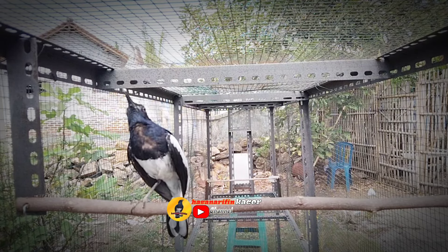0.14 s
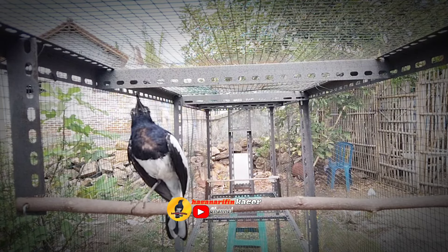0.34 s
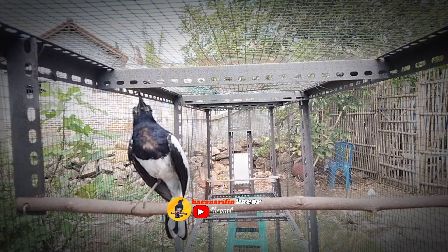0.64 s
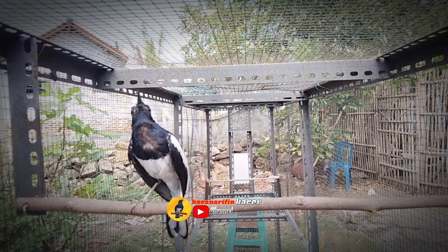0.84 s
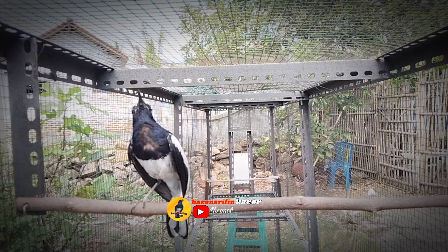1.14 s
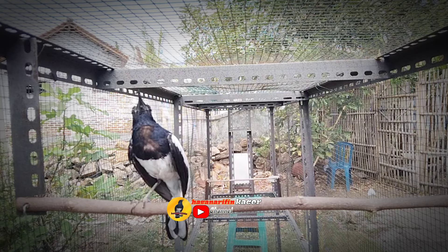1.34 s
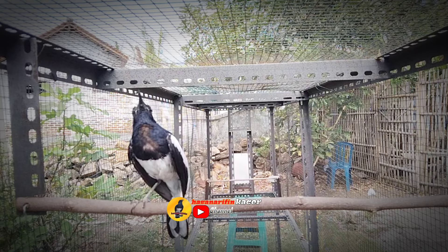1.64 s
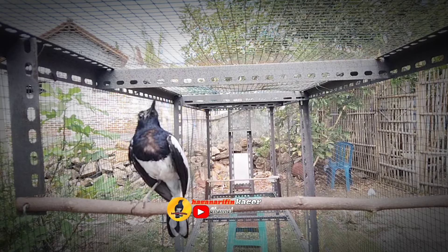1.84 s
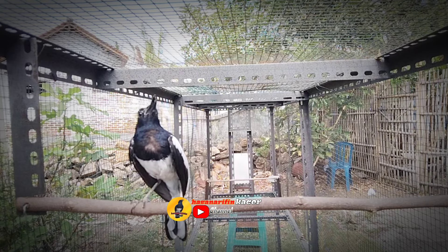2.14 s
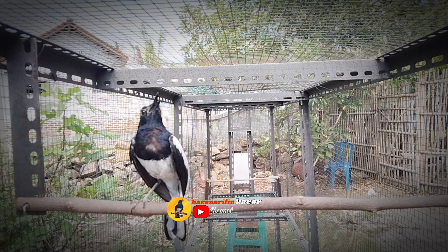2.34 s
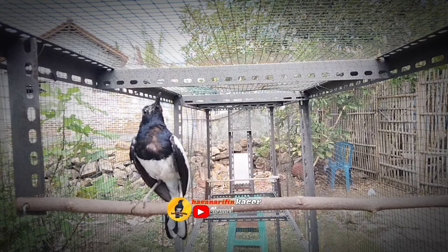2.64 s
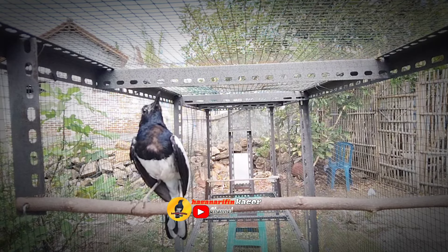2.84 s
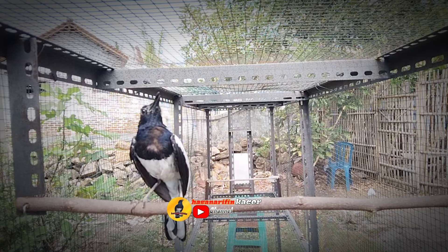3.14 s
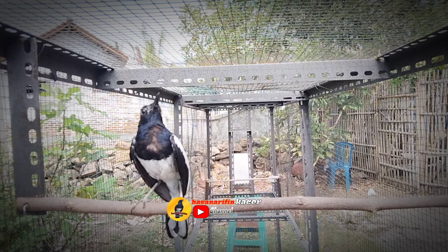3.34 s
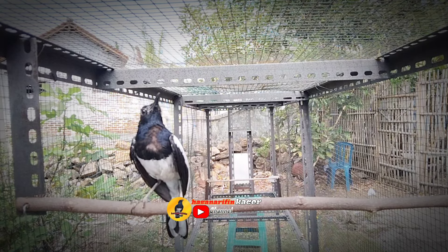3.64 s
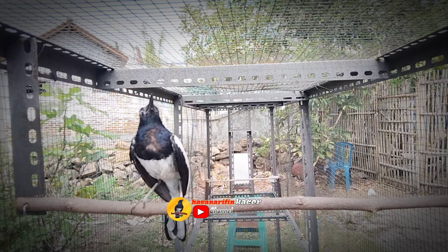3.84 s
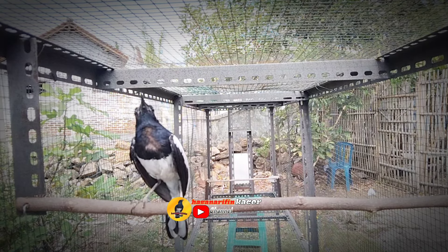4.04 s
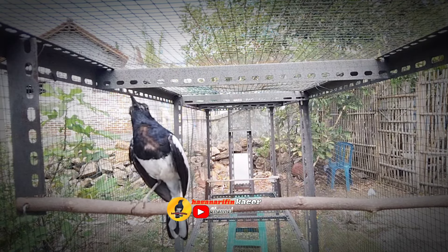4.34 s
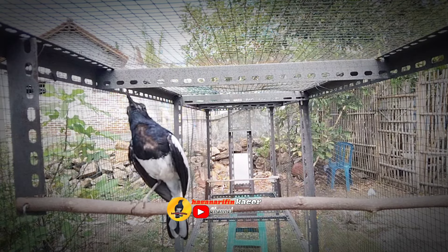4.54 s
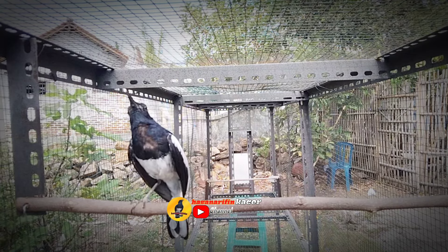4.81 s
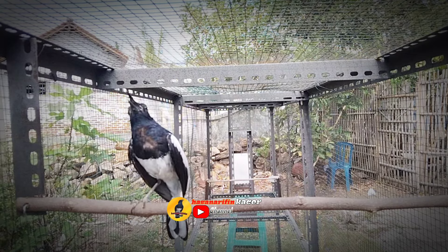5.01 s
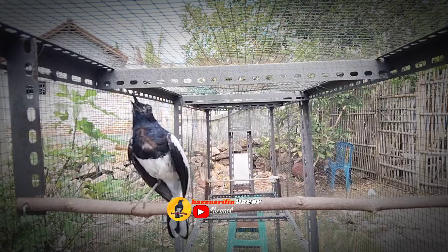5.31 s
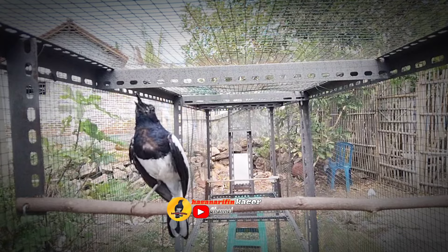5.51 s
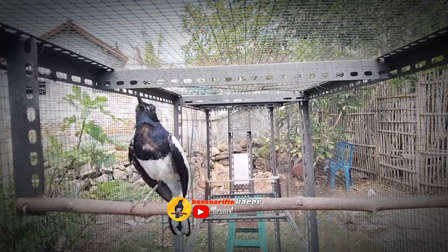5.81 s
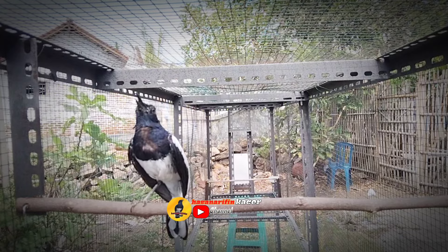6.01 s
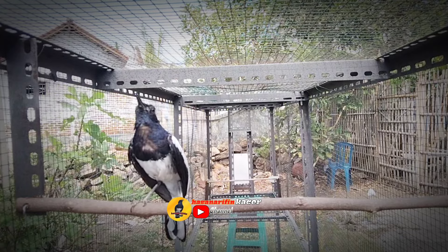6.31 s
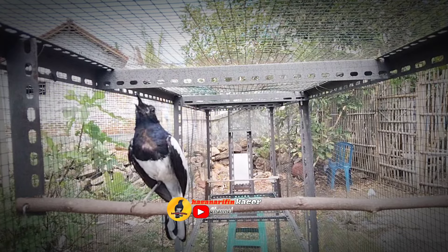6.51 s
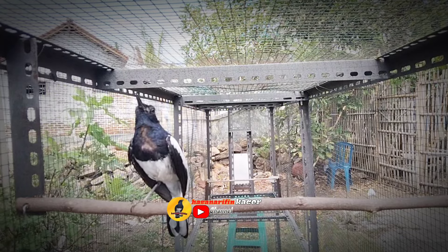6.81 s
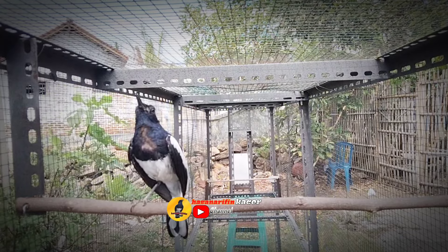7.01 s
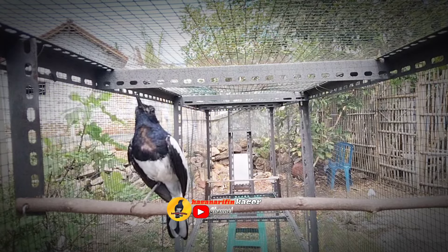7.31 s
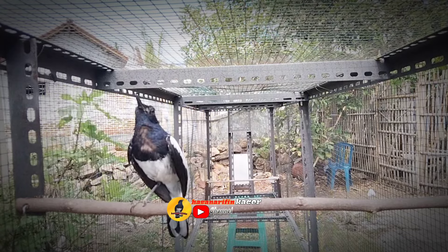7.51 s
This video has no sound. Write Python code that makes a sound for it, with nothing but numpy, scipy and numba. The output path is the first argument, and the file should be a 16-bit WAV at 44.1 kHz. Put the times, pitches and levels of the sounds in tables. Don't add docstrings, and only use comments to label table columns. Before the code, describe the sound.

Bright, quick whistled phrases from a nearby perched bird echo off yard walls over faint distant birds and clatter, until low wind buffets the microphone.

```python
import sys
import numpy as np
from scipy import signal
from scipy.fft import rfft, irfft
from scipy.io import wavfile
from scipy.ndimage import uniform_filter1d, minimum_filter1d
from numba import njit

SR = 44100
rng = np.random.default_rng(int(sys.argv[2]) if len(sys.argv) > 2 else 0)


def voltage_ratio(level):
    return 10 ** (np.asarray(level, float) / 20)


def store_wav(level_fs):
    pcm = np.round(np.clip(np.atleast_2d(level_fs), -1, 1) * 32767)
    wavfile.write(sys.argv[1], SR, pcm.T.astype(np.int16))


N = 337806


def unit(x):
    return x / np.sqrt(np.mean(x ** 2))


def band(x, lo_hz, hi_hz, order=2):
    return signal.sosfilt(signal.butter(order, [lo_hz, hi_hz], "bandpass", fs=SR, output="sos"), x)


def noise_band(lo_hz, hi_hz, order=2):
    return unit(band(rng.standard_normal(N), lo_hz, hi_hz, order))


def walk(rate_hz):
    k = int(SR / rate_hz)
    steps = np.repeat(rng.standard_normal(N // k + 1), k)
    return unit(uniform_filter1d(uniform_filter1d(steps, k), k)[:N])


def span(start_s, end_s):
    return np.interp(np.arange(N) / SR, [start_s - .003, start_s, end_s, end_s + .003], [0, 1, 1, 0])


def score(notes, edge_s):
    t = np.arange(N) / SR
    s, *columns = np.transpose(np.concatenate(notes))
    gate = np.zeros(N)
    for note in notes:
        start_s, end_s = note[0][0], note[-1][0]
        part = slice(max(int((start_s - edge_s) * SR), 0), int((end_s + edge_s) * SR))
        inside_s = np.minimum(t[part] - start_s, end_s - t[part])
        gate[part] += np.clip(inside_s / edge_s + 1, 0, 1)
    smooth = [uniform_filter1d(uniform_filter1d(np.interp(t, s, c), size=120), size=120) for c in columns]
    return smooth, np.minimum(gate, 1) ** 2


def whistle(hz, partials, rough, doubling=0):
    phase = 2 * np.pi * np.cumsum(hz) / SR
    tone = 0
    for k, strength in enumerate(partials, 1):
        below_top = np.clip((15700 - k * hz) / 500, 0, 1)
        tone = tone + strength * np.sin(k * phase) * below_top
    return np.sqrt(2) * tone * (1 + rough + 2 * doubling * np.sin(phase / 2))


WALLS_T60_S, WALLS_DB, WALLS_EARLY_DB, WALLS_LUMPS_DB = 0.53, -20.5, 10.5, 4.5
# from_hz, to_hz, level_db, extra_fade_s (per 60 dB)
WALLS_TREBLE = [
    (4730, 7500, -0.5, 1),
    (7560, 11000, -8, 1.5),
]


def echo(x, t60_s, early_db):
    t = np.arange(SR) / SR
    decay = voltage_ratio(-60 * t / t60_s) + voltage_ratio(early_db - 60 * t / .07)
    decay = decay * np.clip(t / .004, 0, 1)
    lumps_db = WALLS_LUMPS_DB * walk(150)[:SR] + 2.5 * walk(25)[:SR]
    noise = rng.standard_normal(SR) * decay * voltage_ratio(lumps_db)
    tail = band(noise, 1300, 5200)
    for lo_hz, hi_hz, db, fade_s in WALLS_TREBLE:
        tail = tail + voltage_ratio(db - 60 * t / fade_s) * band(noise, lo_hz, hi_hz)
    return signal.fftconvolve(x, tail / np.sqrt(np.sum(tail ** 2)))[:N]


# start_s, pitch_hz, level_db
FAR_NOTES = [
    [(0, 3954, -53), (.08, 3970, -51)],
    [(2.25, 3844, -30), (2.3, 3902, -34.5), (2.39, 3740, -31)],
    [(3.44, 3800, -58), (3.49, 4437, -44), (3.7, 4094, -47), (3.76, 4430, -53), (3.82, 4250, -61.5)],
    [(4.715, 4110, -58), (4.74, 3974, -54), (4.78, 3950, -52)],
    [(5.84, 3920, -55), (5.93, 3800, -45.5), (6.09, 3718, -40)],
    [(6.835, 5925, -51), (6.857, 5253, -45), (6.873, 4829, -57)],
    [(6.905, 4450, -62.5), (6.93, 4737, -47), (7.03, 4280, -52), (7.12, 4230, -44.5)],
    [(7.135, 4600, -56), (7.153, 5060, -48), (7.169, 3646, -53.5)],
    [(7.18, 4670, -55.5), (7.205, 5150, -51), (7.222, 4510, -55)],
    [(7.585, 4387, -55), (7.66, 4376, -51)],
]
CHIPS = [.22, 1.385, 3.317, 4.37, 5.54, 6.49, 7.562]
# time_s (from its start), pitch_hz, level_db
CHIP = [
    (0, 6200, -49),
    (.015, 7400, -38),
    (.042, 6150, -47),
]
# from_hz, to_hz, level_db
LINGER = [
    (2600, 3500, -55),
    (5200, 6400, -51),
]


def far_birds():
    waver, rough = 1 + 0.0052 * walk(60), 0.38 * walk(80)

    def sing(notes, second_db):
        (hz, db), gate = score(notes, .0048)
        return whistle(hz * waver, [1, voltage_ratio(second_db)], rough) * gate * voltage_ratio(db)

    chips = sing([np.add(CHIP, (s, 0, 0)) for s in CHIPS], second_db=-44.5)
    near = sing(FAR_NOTES, second_db=-20.5)
    linger = sum(voltage_ratio(db) * noise_band(lo_hz, hi_hz) for lo_hz, hi_hz, db in LINGER)
    linger = linger * voltage_ratio(-60 * np.arange(N) / SR / WALLS_T60_S)
    return linger + near + .5 * chips + echo(.55 * near + chips, .55, early_db=0)


@njit
def svf(x, hz, share):
    y, b, l = np.empty(len(x)), 0., 0.
    for i in range(len(x)):
        g = np.tan(np.pi * hz[i] / SR)
        v = (b + g * (x[i] - l)) / (1 + g * (g + share))
        b, l, y[i] = 2 * v - b, l + 2 * g * v, share * v
    return y


YARD_HZ, YARD_HZ_PER_DB = 766.4, 26
# start_s, level_db
YARD = [(.35, -56.5), (.9, -58), (1.2, -62.5), (1.629, -58.5), (1.928, -51.5), (2.2, -54), (2.84, -56.5),
        (3.028, -52.5), (3.56, -55), (3.991, -53.5), (4.6, -60.5), (5.089, -59), (5.45, -61.5),
        (5.719, -54), (5.92, -50.5), (6.22, -50), (6.58, -48.5), (6.9, -48), (7.269, -53)]


def yard():
    t = np.arange(N) / SR
    s, db = np.transpose(YARD)
    hz = YARD_HZ + YARD_HZ_PER_DB * (db.max() - db)
    latest = np.maximum(np.searchsorted(s, t) - 1, 0)
    centre = uniform_filter1d(hz[latest], size=400)
    swells = sum(np.interp(t - s, [0, .07, .16, .35], [0, voltage_ratio(db), voltage_ratio(db - 10.5), 0]) for s, db in YARD)
    patches = 0
    for ratio, patch_db in [(.7, -6), (1, -1.5), (1.4, -4.5), (1.9, -7)]:
        patch = svf(svf(rng.standard_normal(N), centre * ratio, .14), centre * ratio, .14)
        patches = patches + voltage_ratio(patch_db + 6 * walk(10)) * unit(patch)
    hiss = voltage_ratio(-64.0 + 4.8 * walk(8)) * noise_band(300, 6000)
    return patches * swells + hiss


def traffic():
    swell_db = np.interp(np.arange(N) / SR, [2.4, 3.4, 4.1, 5.3], [-80.5, -70, -71.5, -77])
    return voltage_ratio(swell_db + 2.5 * walk(3.6)) * noise_band(28, 75)


# time_s, level_db
GUST = [(0, -71), (2.15, -73.5), (2.21, -51.5), (2.45, -73.5), (4.53, -69), (4.57, -56), (4.7, -69),
        (5.77, -72), (5.81, -49.5), (6.1, -55.5), (6.25, -37), (6.5, -44), (6.75, -29), (6.9, -22.5),
        (7.0, -45), (7.17, -28.5), (7.3, -39), (7.4, -18.5), (7.66, -27.5)]
# peak_s, peak_db, pitch_hz
THUMPS = [(.83, -49, 250), (0.899, -45, 350), (2.205, -34, 301.5), (2.24, -40, 150), (2.3, -44, 200),
          (2.44, -49, 200), (2.568, -49, 200), (4.03, -46, 251.3), (4.4, -54, 220), (4.57, -42.5, 150),
          (6.865, -22.5, 160), (7.385, -10.5, 200), (7.402, -16, 220), (7.438, -13.5, 110),
          (7.473, -17, 129.5), (7.506, -10.5, 192), (7.54, -18, 180), (7.567, -1, 151), (7.609, -9.5, 150),
          (7.651, -5, 159.4)]
# pitch_hz, level_db (per Hz)
WIND = [
    (25, -24),
    (60, -5.5),
    (110, 3.5),
    (204, -9.5),
    (367, -29.5),
    (780, -57.5),
    (1320, -120),
]


def wind():
    t = np.arange(N) / SR
    f = np.maximum(np.arange(N // 2 + 1) * SR / N, 1)
    hz, db = np.transpose(WIND)
    colour = voltage_ratio(np.interp(np.log(f), np.log(hz), db))
    lumps = rng.standard_normal(N) * voltage_ratio(3 * walk(25) + 4 * walk(9))
    rumble = unit(irfft(rfft(lumps) * colour, N))
    thumps = 0
    for s, db, hz in THUMPS:
        u = (t - s) * hz
        thumps = thumps + voltage_ratio(db) * np.cos(2 * np.pi * u) * np.exp(-np.where(u < 0, 2.2, 1.6) * u ** 2)
    return rumble * voltage_ratio(np.interp(t, *np.transpose(GUST))) + thumps - uniform_filter1d(thumps, size=500)


BREAK_S_PER_JUMP = .014
# start_s, upward_jump (share of pitch)
BREAKS = [(1.126, .4), (1.138, .2), (2.838, .35), (2.849, .35), (2.856, .15), (4.292, .45), (4.303, .3),
          (4.317, 0.036), (5.804, 0.28), (5.813, .3), (5.824, .05), (5.337, .01), (5.402, .01), (2.21, .03),
          (6.385, .02), (.81, .02), (2.871, 0.045), (1.152, 0.033), (6.087, .02), (7.455, .3), (7.465, .25)]
# first_crest_s (or start of the swell),
# end_s, rate_hz, pitch_swing (share), level_swing_db (negative: louder)
FLUTTER = [
    (2.195, 2.218, 150.3, 0.046, 0),
    (2.224, 2.31, 103.3, .04, 2.5),
    (3.994, 4.051, 103.4, 0.035, 1),
    (4.055, 4.103, 103.3, .035, 4),
    (4.106, 4.139, 72.15, .025, 1),
    (6.383, 6.401, 62.66, 0, -3.5),
    (2.414, 2.426, 62.2, 0, -3.5),
    (2.548, 2.565, 83.4, 0.00085, -3),
]


def throat_motion():
    t = np.arange(N) / SR
    bend, swell_db, jump, dip = np.ones(N), np.zeros(N), np.ones(N), np.ones(N)
    for s, end, rate_hz, swing, swing_db in FLUTTER:
        active = span(s, end)
        wave = np.cos(2 * np.pi * rate_hz * (t - s)) * active
        bend, swell_db = bend + swing * wave, swell_db + swing_db * (wave - active)
    for s, up in BREAKS:
        length = up * BREAK_S_PER_JUMP
        corners_s = [-.006, -.001, .0005, .85 * length, length + .0005]
        jump = jump + up * np.interp(t, s + np.array(corners_s), [0, -.12, 1, .7, 0])
        dip = dip * np.interp(t - s, [-.002, 0, .002], [1, .25, 1])
        dip = dip * np.interp(t - s - length, [-.0015, 0, .0015], [1, 1 - up, 1])
    return bend, swell_db, jump, dip


def sung(song):
    notes = []
    for shape, rows in song:
        place, hz, *levels = np.transpose(shape)
        for start, turn, end, *factors in rows:
            s = np.interp(place, [0, 1, 2], [start, turn, end])
            bend = np.interp(place, [0, 2], factors or [1, 1])
            notes.append(np.transpose([s, hz * bend, *levels]))
    return sorted(notes, key=lambda note: note[0][0])


# place (0 start, 1 turn, 2 end),
# pitch_hz, level_db
DROOP = [(0, 5403, -24), (.11, 5298, -12), (1, 5184, -7), (1.79, 4938, -16), (2, 4944, -26)]
ARCH = [(0, 5093, -21), (.47, 5340, -5.5), (1, 5480, -9.5), (1.23, 5414, -4), (1.85, 4970, -11),
        (2, 4925, -23)]
HALF_PITCH = [(0, 2082, -42.5), (2, 2022, -46)]
PLUNGE = [(0, 5877, -16.5), (.5, 5480, -11), (1, 4794, -12), (2, 3302, -21)]
SCREECH = [(0, 4620, -24.5), (.6, 5470, -6.5), (1, 5740, -6.5), (1.1, 5513, -3.5), (1.55, 5000, -11),
           (2, 4900, -23.5)]
WISP = [(0, 3800, -27.5), (1, 3600, -32.5), (1.6, 4050, -31), (2, 3700, -38.5)]
SCREECH_TAIL = [(0, 4917, -21), (1, 5253, -11.5), (2, 5200, -21)]
# shape, then rows of start_s, turn_s,
# end_s
HIGH_SONG = [
    (DROOP, [(.402, .458, .518)]),
    (PLUNGE, [(.895, .903, 0.91)]),
    (ARCH, [(5.098, 5.13, 5.207)]),
    (SCREECH, [(2.212, 2.233, 2.3), (3.995, 4.016, 4.1)]),
    (SCREECH_TAIL, [(4.101, 4.121, 4.139)]),
    (HALF_PITCH, [(.08, .084, .089), (4.78, 4.784, 4.79)]),
    (WISP, [(6.624, 6.638, 6.657)]),
]


def upper_side(bend, swell_db, waver, air):
    (hz, db), gate = score(sung(HIGH_SONG), 0.0026)
    return whistle(hz * bend * waver, [1, voltage_ratio(-29.0), voltage_ratio(-37.0)], air) * gate * voltage_ratio(db + swell_db)


# place (0 start, 1 turn, 2 end), pitch_hz, level_db, second_db (against the first)
DROP = [(0, 4042, -6.5, -18), (1, 3609, -7, -23.5), (2, 2755, -21, -25.5)]
RISE = [(0, 2579, -32.5, -5.5), (.55, 2762, -25, 12.5), (1, 2930, -19, 7.5), (1.3, 3051, -16.5, -5.5),
        (1.6, 3204, -17.5, -13.5), (2, 3392, -29.5, -4.5)]
SNAP = [(0, 7005, -11, -16.5), (.43, 6910, -5.5, -13), (1, 4303, -14, -18.5), (1.58, 5294, -16.5, -23.5),
        (2, 4301, -18.5, -19)]
HARSH = [(0, 1780, -32, 2), (.2, 2270, -23.5, -0.5), (.45, 2861, -18, 4), (1, 3240, -11.5, 3.5),
         (1.12, 3200, -17.5, 0), (1.75, 3345, -25, -6), (2, 3407, -36.5, -9.5)]
FLICK = [(0, 2650, -25.5, -1), (1, 2844, -16.5, -3), (1.75, 3040, -11, -8), (2, 4200, -3.5, -11.5)]
TWANG = [(0, 3120, -27.5, -14.5), (.45, 3091, -12.5, -3.5), (1, 3090, -14, 5), (2, 2668, -24.5, 18)]
TWANG_UP = [(0, 2641, -22.5, 18), (1, 3280, -14.5, -21), (2, 3570, -41.5, -28.5)]
CHIRP_FLAT = [(0, 2300, -22, -33), (.5, 2320, -18, -28.5), (1, 2330, -11.5, -27), (2, 2380, -9.5, -33)]
CHIRP_RISE = [(0, 1800, -29.5, -34.5), (.6, 2152, -15, -35), (1, 2300, -12, -25.5), (2, 2380, -9.5, -29)]
PIP = [(0, 2274, -23, -26.5), (2, 2319, -30, -25)]
# shape, then rows of start_s, turn_s, end_s, start_factor, end_factor (of pitch)
LOW_SONG = [
    (RISE, [(.327, .389, 0.45, 1.014, .97), (5.028, 5.088, 5.185, .985, 1.035)]),
    (HARSH, [(2.183, 2.206, 2.32, 1.04, 0.98), (3.972, 3.999, 4.135, 1.033, 0.98)]),
    (FLICK, [(2.383, 2.398, 2.415, 0.99, 1.014), (2.522, 2.535, 2.554, 0.91, 0.97)]),
    (CHIRP_FLAT, [(1.113, 1.13, 1.139, 1.005, 1), (2.832, 2.847, 2.861, .97, 1.01)]),
    (CHIRP_RISE, [(4.291, 4.294, 4.307, 1.065, 0.98), (5.795, 5.806, 5.81, .99, 0.96), (7.443, 7.458, 7.48, 0.99, 1.025)]),
]
# shape, then rows of start_s, turn_s, end_s
LOW_ONCE = [
    (SNAP, [(.888, .909, 0.92)]),
    (DROP, [(.181, .187, .196)]),
    (PIP, [(4.281, 4.284, 4.287)]),
    (TWANG, [(4.541, 4.556, 4.578)]),
    (TWANG_UP, [(4.579, 4.589, 4.6)]),
]
# time_s, pitch_hz, level_db, second_db (level of second partial)
WARBLES = [
    [(1.337, 2555, -22.5, -52), (1.353, 2398, -9, -47.5), (1.371, 2775, -13, -38.5),
     (1.387, 2750, -14, -27), (1.405, 2707, -11, -29), (1.435, 2693, -20.5, -56), (1.44, 2736, -23, -44)],
    [(1.441, 2777, -25.5, -51.5), (1.459, 3224, -8.5, -36.5), (1.479, 3343, -6.5, -50),
     (1.503, 2138, -18, -37), (1.535, 2821, -11.5, -42), (1.551, 2614, -16, -47), (1.568, 2546, -27, -81)],
    [(3.101, 2656, -27, -58), (3.113, 2291, -7, -47.5), (3.121, 2067, -14.5, -53),
     (3.135, 2564, -11, -31.5), (3.151, 2610, -15, -25), (3.175, 2639, -18, -27.5),
     (3.19, 2657, -15.5, -44.5)],
    [(3.191, 2750, -15.5, -48.5), (3.225, 3283, -8, -36.5), (3.237, 3322, -6.5, -45.5),
     (3.261, 2361, -18.5, -34.5), (3.285, 2741, -12.5, -39.5), (3.303, 2864, -11, -44),
     (3.318, 2766, -30, -67.5)],
    [(6.012, 2660, -31.5, -48), (6.022, 2472, -14.5, -51.5), (6.03, 2290, -11, -45),
     (6.042, 2758, -13, -34), (6.058, 2748, -9, -25), (6.086, 2748, -15.5, -29), (6.1, 2829, -11, -39)],
    [(6.101, 2823, -10, -42.5), (6.127, 3213, -7, -46), (6.147, 3407, -6.5, -30.5), (6.169, 2215, -21, -59),
     (6.173, 2215, -14.5, -40), (6.195, 3143, -10, -40.5), (6.225, 2513, -31, -55)],
]
HOOKS = [
    [(0.082, 3992, -32.5, -69), (0.104, 4623, -18.5, -46), (0.114, 4696, -16.5, -42.5),
     (0.12, 4585, -14.5, -54), (0.132, 4076, -8.5, -37), (0.14, 4046, -4.5, -35.5),
     (0.162, 4008, -5, -26.5), (0.17, 4160, -9, -35.5), (0.18, 4093, -8.5, -29)],
    [(4.782, 3920, -34, -66), (4.808, 4393, -19, -46.5), (4.818, 4300, -18, -58), (4.83, 4014, -9.5, -32.5),
     (4.84, 3903, -8.5, -28), (4.86, 3759, -5, -38), (4.884, 3877, -4, -24.5), (4.898, 3302, -13.5, -49.5),
     (4.908, 3466, -21.5, -59)],
]
FLICK_ENDS = [
    [(2.416, 4485, -17, -35.5), (2.422, 4484, -18.5, -40.5), (2.432, 4013, -4, -23.5),
     (2.448, 3615, -7.5, -44), (2.48, 3634, -16.5, -40.5), (2.492, 3617, -23.5, -71),
     (2.506, 3633, -33, -54)],
    [(2.55, 3976, -11, -33), (2.554, 4129, -21, -28.5), (2.564, 3941, -5.5, -19),
     (2.574, 3617, -8.5, -41.5), (2.58, 3568, -11, -35), (2.614, 3440, -9.5, -60),
     (2.63, 3526, -34.5, -52.5)],
]
CHIRP_ENDS = [
    [(1.146, 2328, -12.5, -59), (1.154, 2277, -9.5, -50), (1.168, 1786, -15, -45),
     (1.186, 1795, -19.5, -42.5), (1.208, 1796, -24, -45), (1.226, 1775, -27, -69.5)],
    [(2.862, 2404, -12.5, -61), (2.868, 2417, -7, -50), (2.888, 1947, -11, -54), (2.896, 1878, -17, -40.5),
     (2.932, 1929, -23, -42), (2.95, 1939, -33.5, -66)],
    [(4.308, 2364, -11, -39), (4.314, 2357, -6.5, -37), (4.332, 2096, -6.5, -53), (4.342, 2006, -12.5, -34),
     (4.372, 1831, -20.5, -44), (4.392, 1792, -32, -65)],
    [(5.82, 2356, -12, -58), (5.826, 2357, -8.5, -54), (5.836, 2225, -7, -54), (5.85, 1890, -14, -43),
     (5.876, 1806, -21.5, -45), (5.892, 1785, -28.5, -65)],
    [(7.472, 2417, -10.5, -53), (7.484, 2393, -6, -46), (7.5, 1943, -9, -59), (7.514, 1882, -13.5, -37.5),
     (7.562, 1771, -26, -58), (7.57, 1760, -35, -81)],
]
GURGLES = [
    [(6.352, 1943, -26.5, -59), (6.37, 2087, -8.5, -49), (6.386, 2542, -15.5, -57),
     (6.398, 1854, -15.5, -38), (6.422, 1782, -12.5, -41.5), (6.446, 1899, -15.5, -40),
     (6.462, 1711, -20.5, -46), (6.474, 1800, -35, -67)],
    [(6.597, 3087, -26, -33.5), (6.605, 3037, -15.5, -12.5), (6.615, 2940, -18, -6),
     (6.633, 2510, -26.5, -10.5), (6.641, 2482, -25.5, -31.5), (6.646, 2516, -37.5, -33)],
]
WHISTLES = [
    [(0.583, 6502, -24, -52), (0.591, 6498, -15.5, -41), (0.617, 6408, -11, -34.5),
     (0.649, 6235, -14.5, -29.5), (0.679, 5833, -7, -55), (0.691, 5601, -4.5, -35.5), (0.74, 5342, -5, -42)],
    [(0.741, 5355, -4, -44), (0.795, 5695, -7.5, -49), (0.809, 6109, -13, -28), (0.817, 6351, -12, -38),
     (0.843, 6706, -13, -28), (0.859, 6730, -17.5, -40), (0.865, 6488, -24, -45)],
    [(5.293, 6370, -26.5, -48.5), (5.301, 6471, -13, -36), (5.325, 6419, -10.5, -28.5),
     (5.363, 6093, -13.5, -30), (5.391, 5898, -8, -53), (5.425, 5508, -8.5, -53), (5.44, 5420, -8.5, -73)],
    [(5.441, 5368, -7, -63), (5.467, 5359, -8, -47), (5.571, 5397, -9, -40), (5.605, 6037, -18, -46),
     (5.615, 6377, -16, -28.5), (5.625, 6536, -20, -45.5), (5.64, 6442, -39.5, -60.5)],
]


def low_notes():
    free = []
    for table in WARBLES + HOOKS + FLICK_ENDS + CHIRP_ENDS + GURGLES + WHISTLES:
        n = np.array(table, float)
        free.append(np.c_[n[:, :2], n[:, 2] + .6, np.maximum(n[:, 3] - n[:, 2], -34)])
    return sorted(sung(LOW_SONG + LOW_ONCE) + free, key=lambda note: note[0][0])


def lower_side(bend, swell_db, jump, dip, waver, air, doubling):
    (hz, db, second_db), gate = score(low_notes(), 0.0018)
    third_db = 0.56 * second_db - 17.5
    step_db = 0.31 * second_db - 6.0
    partials = [1, voltage_ratio(second_db)]
    for k in range(6):
        partials.append((voltage_ratio(third_db + k * step_db) + voltage_ratio(-51)) * voltage_ratio(5 * walk(40)))
    tone = whistle(hz * jump * bend ** .6 * waver, partials, air, doubling)
    return tone * gate * dip * voltage_ratio(db + 1.7 * swell_db)


# start_s, end_s, noise_db
HOARSE = [(0.174, .195, -38.5), (0.373, 0.481, -26.5), (0.901, .922, -22), (2.19, 2.3, -18),
          (2.384, 2.419, -16.5), (2.524, 2.547, -11), (3.982, 4.13, -20), (4.585, 4.6, -23.5),
          (4.886, 4.907, -23), (5.086, 5.133, -20), (6.621, 6.649, -17)]


def songbird():
    bend, swell_db, jump, dip = throat_motion()
    hoarse = sum(voltage_ratio(db) * span(s, end) for s, end, db in HOARSE)
    hoarse = hoarse + .25 * uniform_filter1d(np.abs(jump - 1), size=600)
    doubling = 0.25 * hoarse * np.clip(1 + .5 * walk(200), 0, 2)
    rasp = 0.67 * hoarse * noise_band(300, 4500, order=1)
    air = voltage_ratio(-40.5) * noise_band(1200, 2500) + 0.04 * walk(150) + 0.19 * walk(70) + rasp
    waver = 1 + .006 * walk(90) + .12 * hoarse * walk(400)
    high = upper_side(bend, swell_db, waver, air)
    low = lower_side(bend, swell_db, jump, dip, waver, air, doubling)
    both = low * high
    mixed = voltage_ratio(6) * band(both, 7000, 16000, order=3) + voltage_ratio(-1) * both * (low + high)
    difference = band(voltage_ratio(-9) * both + voltage_ratio(-16) * mixed, 600, 2800, order=3)
    effort = uniform_filter1d(np.abs(low + high), size=130)
    beak = effort * (voltage_ratio(-54) + .07 * hoarse) * noise_band(6000, 15500)
    return band(low + high + mixed + beak, 1150, 15800, order=4) + difference


def nearest_wall(bird):
    return voltage_ratio(-24.5) * np.roll(band(bird, 1500, 7000, order=1), int(.03 * SR))


def scene():
    bird = songbird()
    walls = voltage_ratio(WALLS_DB) * echo(bird, WALLS_T60_S, WALLS_EARLY_DB)
    return (bird + nearest_wall(bird) + walls + far_birds() + yard() + wind() + traffic())[None]


def low_pass(x):
    return signal.sosfilt(signal.butter(12, 15960, fs=SR, output="sos"), x)


def record(dry):
    overload = 1.015
    bright = dry + 0.74 * band(dry[0], 12000, 13000)
    room_left = overload / np.maximum(np.abs(bright), overload)
    gain = uniform_filter1d(minimum_filter1d(room_left, size=129), size=129)
    return low_pass(np.clip(gain * bright, -1, 1))


dry = scene()
out = record(dry)
store_wav(out)
```